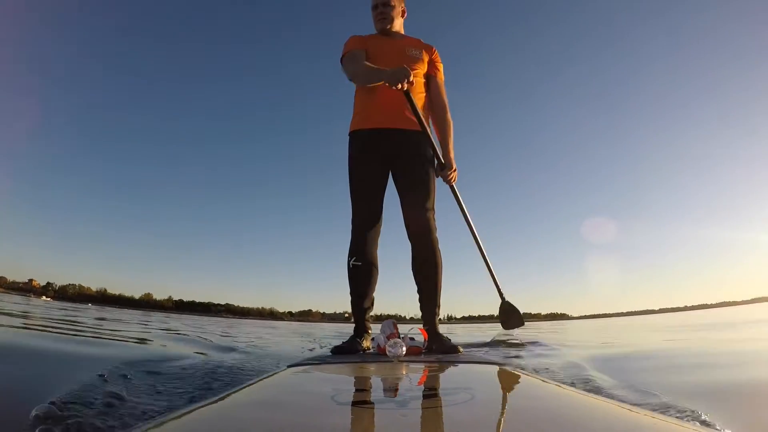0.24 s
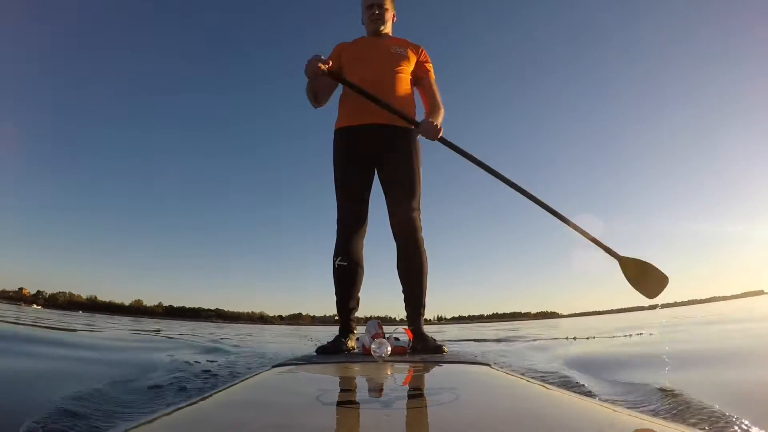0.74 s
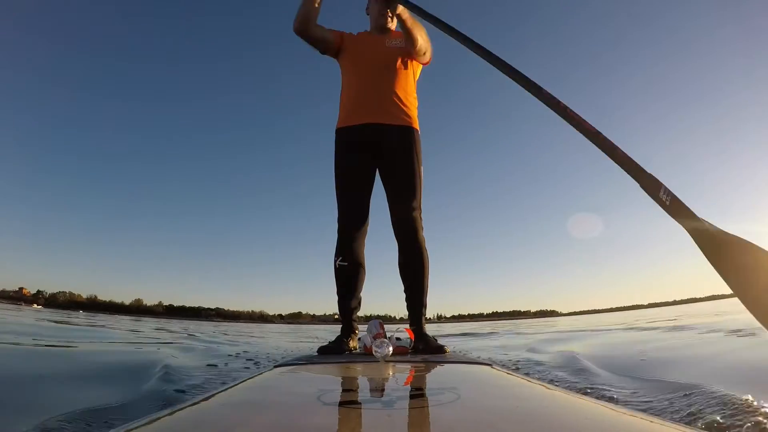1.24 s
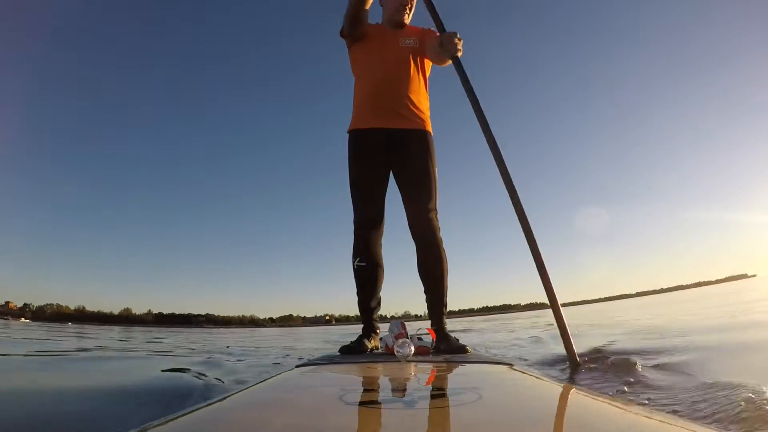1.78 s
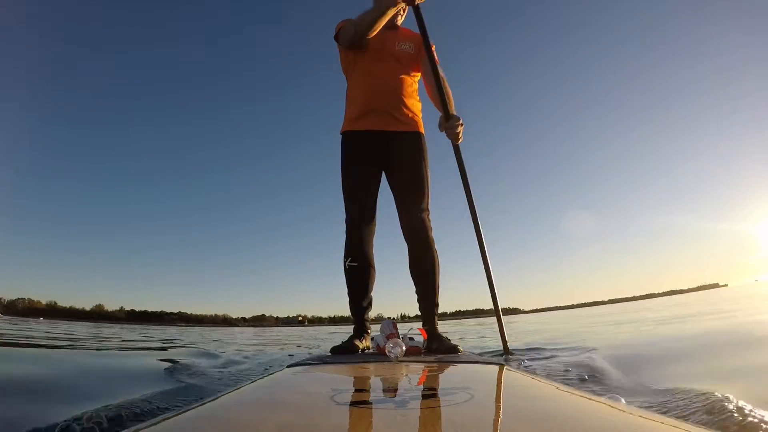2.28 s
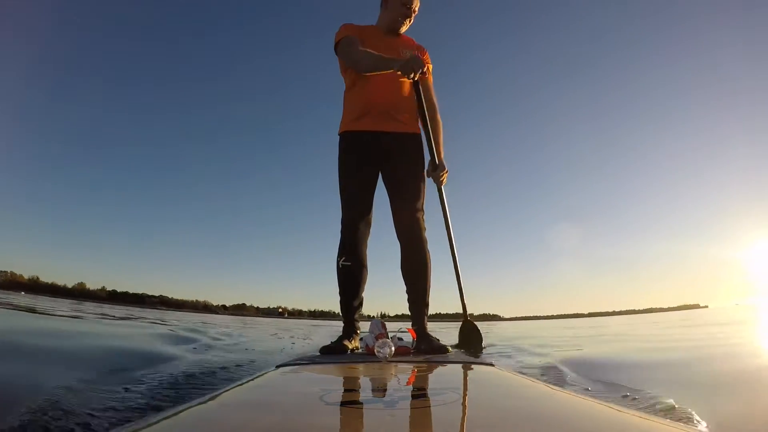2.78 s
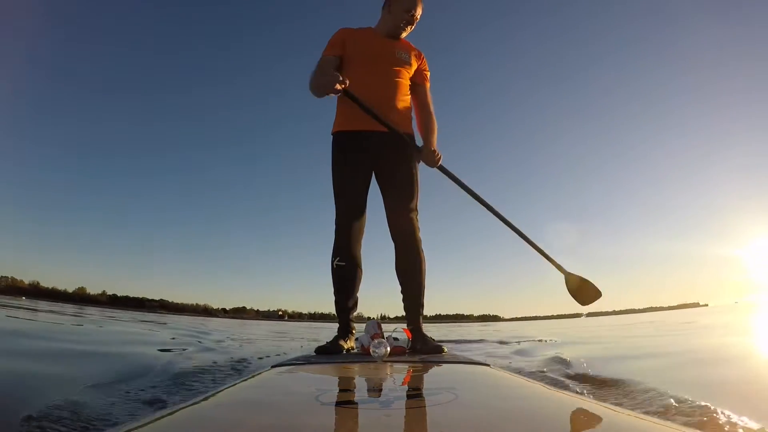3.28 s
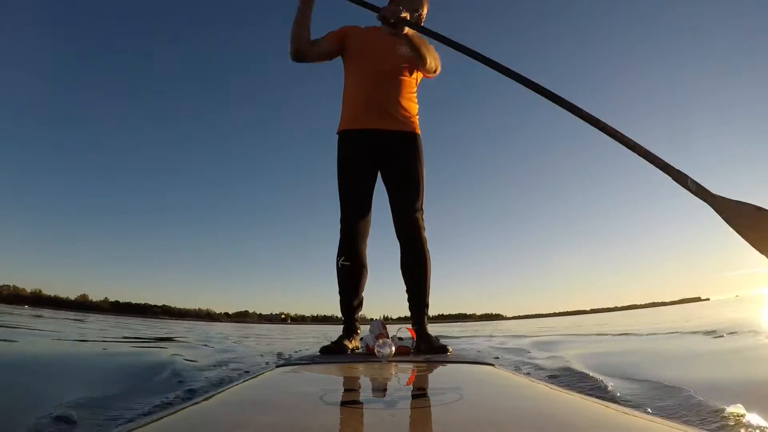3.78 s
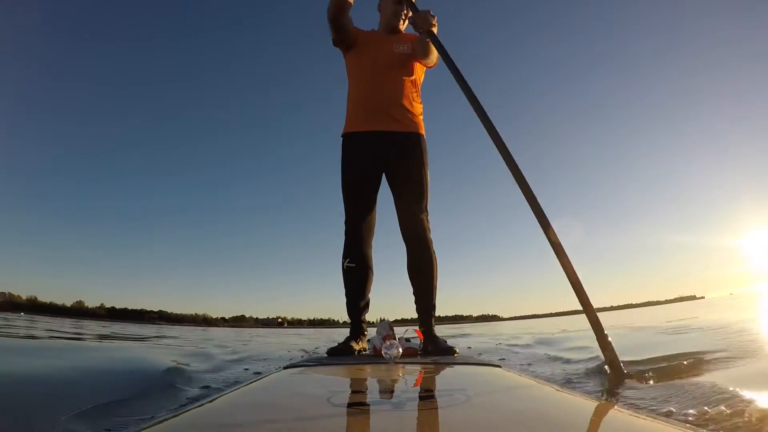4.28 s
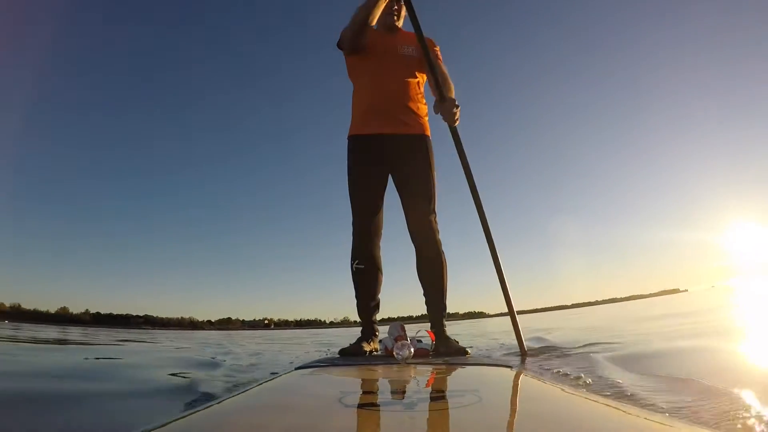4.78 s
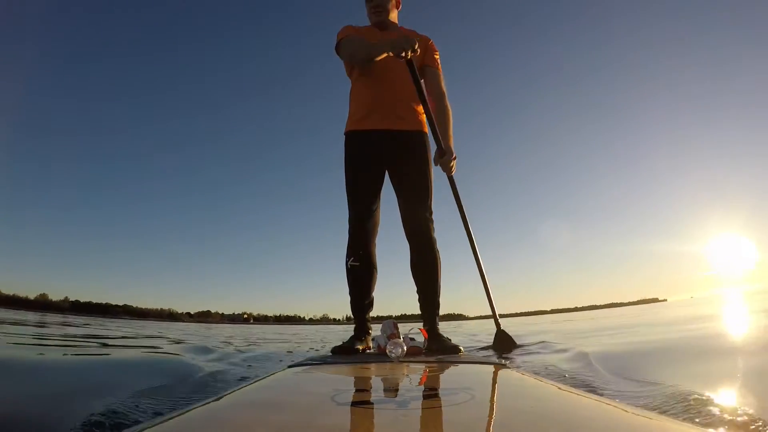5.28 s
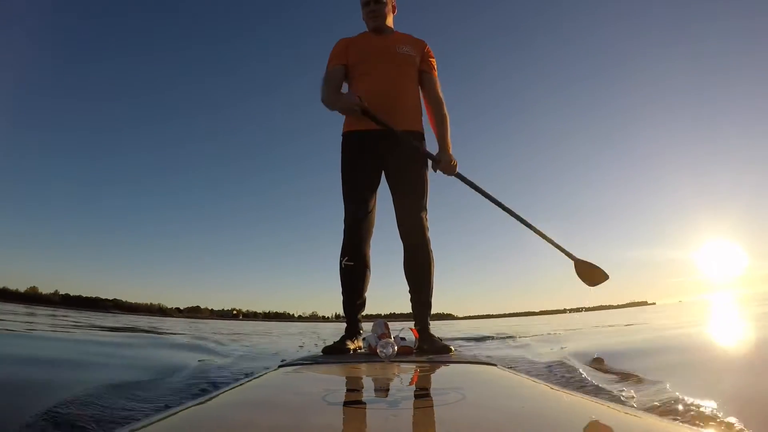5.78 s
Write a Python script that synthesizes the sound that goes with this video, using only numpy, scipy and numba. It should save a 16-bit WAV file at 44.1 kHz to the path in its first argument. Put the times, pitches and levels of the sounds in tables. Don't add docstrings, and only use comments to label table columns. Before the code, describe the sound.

A board glides over calm open water. Hollow knocks and plops come in clusters, strongest early, just after one second and past five seconds, over gurgling bow-wave water and a low rumble of ripples. Mid-pitched bubbles glug between them and drops tick on the deck. A short lull leaves a faint hull hum and hiss. Microphones sit in a closed case very near the water; lows lean right.

```python
import sys
import numpy as np
from scipy import signal
from scipy.fft import rfft, irfft, next_fast_len
from scipy.io import wavfile
from numba import njit

SR = 44100
rng = np.random.default_rng(int(sys.argv[2]) if len(sys.argv) > 2 else 0)


def invert_db(level):
    return 10 ** (np.asarray(level, dtype=float) / 20)


def file_out(sig):
    cols = np.atleast_2d(sig).T
    lim = np.clip(cols, -1, 1)
    pcm = np.round(lim * 32767).astype(np.int16)
    wavfile.write(sys.argv[1], SR, pcm)


N = 266364


def in_time(rows):
    time_s, *columns = np.transpose(rows)
    return [np.interp(np.arange(N) / SR, time_s, column) for column in columns]


def at_hz(rows, hz, column=1):
    rows = np.array(rows)
    return np.interp(np.log(np.maximum(hz, 1)), np.log(rows[:, 0]), rows[:, column])


def drift(rate_hz):
    step = 40
    pole = np.exp(-2 * np.pi * rate_hz * step / SR)
    noise = rng.standard_normal(N // step + 2002)
    slow = signal.lfilter([1], [1, -2 * pole, pole * pole], noise)[2000:]
    return np.interp(np.arange(N) / step, np.arange(len(slow)), slow / slow.std())


@njit
def add(out, at, size, turn, cycles, rise, slip):
    for k in range(len(at)):
        life = cycles[k] * 2 * np.pi / turn[k]
        phase = 0.
        for i in range(min(int(life), out.shape[1] - at[k])):
            age = 9 * i / life
            fade = size[k] * age * np.exp(1 - age)
            out[0, at[k] + i] += fade * np.sin(phase)
            out[1, at[k] + i] += fade * np.sin(phase + slip[k])
            phase += turn[k] * (1 + rise[k] * (age - 1.5))


def bubbles(at, size, hz, cycles, rise):
    out = np.zeros((2, N))
    chance = rng.random((len(at), 2))
    climb, slip = 2 * rise * chance[:, 0], 2 * np.pi * chance[:, 1]
    add(out, at, size, 2 * np.pi * hz / SR, cycles, climb, slip)
    return out


def swarm(surge, per_s, low_hz, high_hz, cycles, rise, spread_db, clump_db, smooth_db):
    clumps = invert_db(clump_db * (0.8 * surge + 0.6 * drift(25)))
    at = np.flatnonzero(rng.random(N) < per_s * clumps / SR)
    chance = rng.random((len(at), 3))
    hz = low_hz * (high_hz / low_hz) ** chance[:, 0]
    size = hz * invert_db(spread_db * np.minimum(-np.log(chance[:, 1] + 1e-9), 4))
    grains = bubbles(at, size, hz, cycles * (0.125 + 2.27 * chance[:, 2] ** 2), rise)
    band = signal.butter(2, [low_hz, high_hz], "band", fs=SR, output="sos")
    rush = clumps ** 0.716 * signal.sosfilt(band, rng.standard_normal((2, N)))
    return grains / grains.std() + invert_db(smooth_db) * rush / rush.std()


# pitch_hz [Hz], gain_db [dB], phase_rad [rad], shared_share [0-1]
PORTS = [(58.5, -2, 1.6, 0.9), (100, -12, 0.73, 0.77), (216, -23, -2.22, 0.4), (300, -16, -3.5, 0.87),
         (390, -10.5, -4, 1), (600, -6, -3, 0.81), (850.4, -0.5, -3, 0.91), (1095, 0.5, -3.5, 0.74),
         (1997, -2.5, -4.5, 1), (2798, -3, -5, 0.98), (3536, -4, -4, 0.1), (4640, -4, -7.5, 0.6),
         (7070, -4, -7, 0), (9940, -8.5, -13, 0.05)]


def heard(paths, body):
    size = next_fast_len(N + 8192)
    hz = np.arange(size // 2 + 1) * SR / size
    cepstrum = irfft(np.log(invert_db(at_hz(body, hz))), size)
    cepstrum[1:size // 2] *= 2
    cepstrum[size // 2 + 1:] = 0
    shared, own = rfft(paths, size) * np.exp(rfft(cepstrum))
    share = np.clip(at_hz(PORTS, hz, column=3), 0, 1)
    port = invert_db(at_hz(PORTS, hz)) * np.exp(1j * at_hz(PORTS, hz, column=2))
    left = port * (share * shared + np.sqrt(1 - share ** 2) * own)
    return irfft(np.array([left, shared]), size)[:, :N]


def steady(paths, body, level_db):
    x = heard(paths, body)
    return invert_db(level_db) * x / x.mean(0).std()


def single(events, body, stretch, rise, lift_db):
    start_s, peak_db, hz, cycles = np.transpose(events)
    size = invert_db(peak_db + lift_db - at_hz(body, hz))
    return bubbles((start_s * SR).astype(np.int64), size, hz, stretch * cycles, rise)


def cracks(events, body, hz, cycles, lift_db):
    start_s, peak_db = np.transpose(events)[:2]
    uneven_db = peak_db + rng.normal(0, 3.0, len(start_s))
    snaps = np.c_[start_s, uneven_db, hz + 0 * start_s, cycles + 0 * start_s]
    return single(snaps, body, 0.47, 0, lift_db)


def brood(events, body, spread, within_s, lift_db):
    start_s, peak_db, hz, cycles = np.repeat(events, 3, axis=0).T
    chance = rng.random((len(start_s), 3))
    born_s = np.clip(start_s + within_s * (chance[:, 0] - 0.25), 0, N / SR - 0.01)
    young_hz = hz * spread ** (2 * chance[:, 2] - 1)
    young = np.c_[born_s, peak_db - 6.0 * chance[:, 1], young_hz, cycles]
    return single(young, body, 0.485, 0.015, lift_db)


def with_cycles(events, cycles):
    return np.c_[events, np.full(len(events), cycles)]


def walls(body, low_hz, high_hz):
    return [(low_hz, -50)] + list(body) + [(high_hz, -70)]


# pitch_hz [Hz], level_db [dB per Hz]
SEAL = [(3000, 2.5), (4000, -2), (5000, -9.5), (5700, -5), (6800, -8.5), (8000, -17), (9500, -32.5),
        (11000, -43.5), (12500, -50), (13800, -36)]


def seal():
    return walls(SEAL, 1200, 16000)


# pitch_hz [Hz], level_db [dB per Hz]
CASE = [(800, -7.5), (1030, -4), (1180, -2.5), (1330, -1), (1450, 1.1), (1560, -9), (1750, -4),
        (2000, -6.5), (2200, -14.5), (2500, -14), (3000, -24), (3600, -38)]


def case():
    return walls(CASE, 370, 3600)


# pitch_hz [Hz], level_db [dB per Hz]
HULL = [(20, -21), (33, -12.5), (45, -17), (75, -10.5), (110, 0.5), (135, -6), (165, -9.5), (220, -7.5),
        (300, -11.5), (360, -10.5), (425, -7), (480, -16), (600, -21), (800, -24)]


def hull():
    return walls(HULL, 19, 2300)


def preamp_hiss(ripple_db):
    creep_db = 11.5 * np.arange(N) / SR
    quiet_db = ripple_db.mean() + creep_db - np.maximum.accumulate(ripple_db + creep_db)
    band = signal.butter(2, [3300.0, 11500.0], "band", fs=SR, output="sos")
    hiss = signal.sosfilt(band, rng.standard_normal((2, N)))
    return invert_db(-62 + 0.7 * quiet_db) * hiss


# [dB, spray over flow]
WAKE = [(0.22, -24.5, -22), (0.72, -36.5, -21.5), (1.09, -30, -20.5), (1.37, -37, -15.5), (1.4, -40.5, -28),
        (1.7, -45.5, -17.5), (1.83, -34, -19), (2.12, -26, -23.5), (2.56, -34.5, -16.5), (3.0, -30, -20),
        (3.73, -35, -22.5), (3.88, -42.5, -15), (4.02, -34.5, -8), (4.3, -37.5, -19.5),
        (4.52, -54.5, -15.5), (5.05, -36.5, -15), (5.12, -27.5, -20), (6.04, -29.5, -21)]


def bow_wave(surge):
    flow_db, thrown_db = in_time(WAKE)
    spray_db = flow_db + thrown_db
    mist_db = -60 + 0.25 * (spray_db - spray_db.mean())
    gurgle = swarm(surge, 1300, 705.3, 3665.0, cycles=13.72, rise=0.0269,
                   spread_db=2.5, clump_db=3.5, smooth_db=-6.0)
    spray = swarm(surge, 2200, 2971.4, 11000.0, cycles=31.5, rise=0.01,
                  spread_db=5.0, clump_db=4.0, smooth_db=-3.0)
    mist = swarm(surge, 1200, 9440.0, 11680.0, cycles=9.2, rise=0.0,
                 spread_db=6.5, clump_db=4.5, smooth_db=1.0)
    wave = steady(gurgle, case(), flow_db - 1.48)
    wave += steady(spray, seal(), spray_db + 1.07)
    return wave + steady(mist, seal(), mist_db)


# start_s [s], peak_db [dB], pitch_hz [Hz]
TICKS = [(0.0644, -26.5, 7110), (0.4088, -22, 5700), (0.6993, -24, 6090), (0.9497, -25.5, 6030),
         (1.2554, -29.5, 5800), (1.4407, -36, 6660), (1.4642, -40, 5270), (1.5195, -22, 4450),
         (1.5585, -29.5, 5470), (1.7716, -25, 5970), (4.7624, -35.5, 7240), (1.8328, -28.5, 5850),
         (2.7323, -21.5, 4500), (2.8692, -20, 6750), (3.274, -27.5, 4780), (3.7549, -29, 5250),
         (3.7788, -24.5, 4030), (3.7883, -27, 4320), (3.8024, -21.5, 6600), (3.909, -30, 5800),
         (4.054, -26, 6230), (4.1253, -23, 6600), (4.3753, -25.5, 6150), (5.075, -20, 5940),
         (5.1194, -15.5, 5920), (5.1411, -18.5, 5470), (5.3449, -22, 5770), (5.4453, -19.5, 5090),
         (5.7129, -20.5, 4290), (5.822, -22, 7580)]


def spray_ticks():
    drop_hz = np.transpose(TICKS)[2]
    ring_s = 0.00645 * (5980 / drop_hz) ** 2.1
    drops = np.c_[TICKS, ring_s * drop_hz]
    ticks = single(drops, seal(), stretch=0.5, rise=0.044, lift_db=-3.0)
    ticks += brood(drops, seal(), spread=1.2, within_s=0.006, lift_db=-13.0)
    return heard(ticks, seal())


# start_s [s], peak_db [dB], pitch_hz [Hz]
PIPS = [(0.0964, -30, 2153), (0.7957, -34.5, 2830), (0.8577, -28.5, 2373), (0.8879, -27.5, 2537),
        (1.0385, -28, 2300), (1.2325, -33.5, 2317), (1.4157, -41, 2350), (1.5179, -31.5, 2750),
        (1.8109, -28.5, 2552), (1.9157, -27.5, 2780), (1.997, -26, 2530), (2.0707, -31, 2246),
        (2.4023, -25, 2415), (2.7316, -26.5, 2706), (2.866, -26.5, 2240), (2.9502, -24.5, 2311),
        (2.9786, -25, 2665), (3.2035, -27.5, 2432), (3.3987, -25.5, 2400), (3.4753, -26.5, 3037),
        (3.783, -18.5, 2293), (4.15, -27.5, 2884), (5.1052, -29.5, 2392), (5.1178, -22, 2627)]


def small_bubbles():
    pips = with_cycles(PIPS, 34)
    sound = single(pips, case(), stretch=0.89, rise=0.02, lift_db=-0.5)
    sound += brood(pips, case(), spread=1.2, within_s=0.0092, lift_db=-0.5)
    return heard(sound, case())


# start_s [s], peak_db [dB], pitch_hz [Hz], length_cycles [cycles]
GLUGS = [(0.1196, -9, 1465, 5.9), (0.6196, -19, 1483, 19), (0.8179, -14.5, 1352, 25), (0.86, -12, 1465, 17),
         (1.0387, -4, 1713, 7.9), (1.0814, -11.5, 1754, 21), (1.232, -12, 1641, 42),
         (1.3779, -15, 1268, 9.3), (1.5602, -14.5, 1813, 17), (1.8095, -9.5, 1560, 6.3),
         (2.3264, -11.5, 1580, 22), (2.6465, -14.5, 1333, 63), (2.7579, -10.5, 1807, 15),
         (2.8669, -10.5, 1643, 24), (3.0395, -8, 1836, 39), (3.11, -8, 1394, 14), (3.3739, -14, 1420, 60),
         (3.7559, -14.5, 1396, 21), (3.7763, -4, 1370, 5.6), (3.79, -12.5, 1495, 27),
         (3.843, -13.5, 1259, 21), (4.0593, -19.5, 1349, 45), (4.121, -6, 1490, 8.2),
         (4.248, -12.5, 1481, 33), (4.6823, -19.5, 1206, 12), (4.7843, -13.5, 1389, 22),
         (4.9497, -18.5, 1402, 30), (5.029, -12, 1367, 66), (5.11, -13, 1262, 18), (5.5418, -6.5, 1289, 13)]


def large_bubbles():
    glugs = single(GLUGS, case(), stretch=0.575, rise=0.013, lift_db=-1.5)
    glugs += brood(GLUGS, case(), spread=1.369, within_s=0.012, lift_db=-3.0)
    snaps = cracks(GLUGS, seal(), hz=5370.0, cycles=4.7, lift_db=-16.5)
    return heard(glugs, case()) + heard(snaps, seal())


# start_s [s], peak_db [dB], pitch_hz [Hz], length_cycles [cycles]
HUMS = [
    (4.625, -35.5, 600, 130),
    (4.63, -29, 390, 120),
    (4.69, -32.5, 581, 80),
]


def hull_hums():
    return heard(single(HUMS, hull(), stretch=0.548, rise=0.0041, lift_db=1.0), hull())


# start_s [s], peak_db [dB], pitch_hz [Hz]
BRIGHT_KNOCKS = [(0.2973, -9, 740.5), (1.1344, -9, 744), (1.1795, -6.5, 628), (1.2305, -8.5, 728.5),
                 (1.3354, -10.5, 677), (1.376, -13.5, 662.6), (2.4759, -13, 910), (2.7317, -14.5, 658),
                 (2.7925, -17.5, 717), (3.0551, -15, 805), (3.7536, -14.5, 793), (5.1672, -14.5, 699),
                 (5.3086, -13.5, 758), (5.4088, -7, 783), (5.746, -14, 741)]


def bright_knocks():
    knocks = with_cycles(BRIGHT_KNOCKS, 14.5)
    return heard(single(knocks, hull(), stretch=0.548, rise=0.0041, lift_db=1.0), hull())


# [dB, short ripples over long]
RIPPLES = [(0.3, -19, -2), (0.74, -26.5, -7), (1.02, -23.5, -10.5), (1.14, -21, -1.5), (1.5, -20, -8),
           (1.73, -32, -7.5), (1.85, -25, -5.5), (2.03, -17.5, -4), (2.9, -24, -7.5), (2.98, -21, -1.5),
           (3.46, -26, -4), (3.8, -22, -10.5), (4.54, -32, -7.5), (4.8, -31.5, 1), (5.06, -29, -4.5),
           (5.13, -25, 5), (5.5, -22, -3), (6.04, -26.5, -2.5)]


def hull_ripples(surge, ripple_db, chop_db):
    drum = swarm(0 * surge, 120, 22.08, 169.58, cycles=8.37, rise=0.0043,
                 spread_db=0.0, clump_db=1.2843, smooth_db=4.0)
    slosh = swarm(surge, 480, 172.5, 1016.0, cycles=6.11, rise=0.018,
                  spread_db=2.0, clump_db=2.5, smooth_db=-2.0)
    return steady(drum, hull(), ripple_db + 0.38) + steady(slosh, hull(), ripple_db + chop_db)


# start_s [s], peak_db [dB], pitch_hz [Hz]
SLAPS = [(0.2972, -4, 396), (0.344, -4, 401), (0.366, 2.5, 393.7), (0.619, -11, 376), (0.8837, -9.5, 365),
         (1.0393, -8, 322.4), (1.1361, -0.5, 446.6), (1.1579, -1.5, 311.5), (1.1844, -4.5, 374),
         (1.3003, -0.5, 306.8), (1.3371, 2, 360), (1.3778, 4, 412), (2.2456, -3.5, 402),
         (2.3471, -6, 334.5), (2.97, -6.5, 294), (3, -7.5, 356.6), (3.0569, -1.5, 330.2), (3.497, -5, 387),
         (3.6103, -5, 309.5), (3.7264, -8, 320), (3.7774, -1, 341.4), (3.844, -2, 339),
         (4.6955, -11.5, 339), (4.8442, -6.5, 224), (5.0275, -8.5, 253), (5.1219, -4, 300),
         (5.1684, 0.5, 433), (5.2507, -1, 300), (5.4869, 1.5, 395.5), (5.7356, 0, 404)]


def hull_slaps():
    hits = with_cycles(SLAPS, 5.21)
    slaps = single(hits, hull(), stretch=0.548, rise=0.0041, lift_db=1.0)
    snaps = cracks(SLAPS, case(), hz=1530.0, cycles=3.0, lift_db=-12.0)
    return heard(slaps, hull()) + heard(snaps, case())


def scene():
    ripple_db, chop_db = in_time(RIPPLES)
    surge = 0.8 * drift(11) + 0.6 * drift(45)
    running = preamp_hiss(ripple_db) + bow_wave(surge) + hull_ripples(surge, ripple_db, chop_db)
    bow = spray_ticks() + small_bubbles() + large_bubbles()
    board = hull_hums() + bright_knocks() + hull_slaps()
    return running + bow + board


def top_cut(x):
    return signal.sosfilt(signal.butter(12, 14200, fs=SR, output="sos"), x)


def record(dry):
    limited = 1.0386 * np.tanh(dry / 0.963)
    return top_cut(limited)


dry = scene()
out = record(dry)
file_out(out)
```